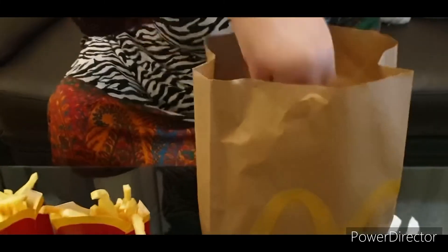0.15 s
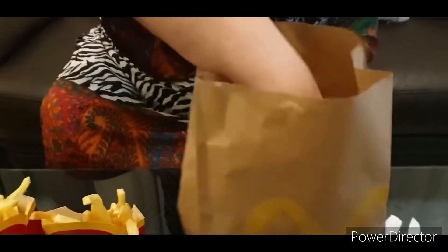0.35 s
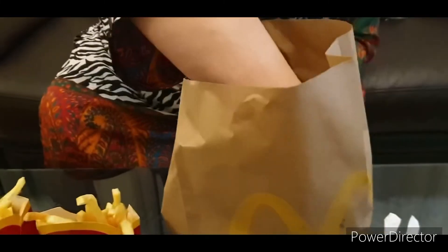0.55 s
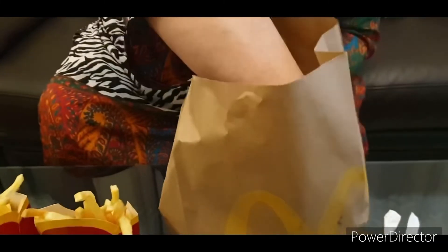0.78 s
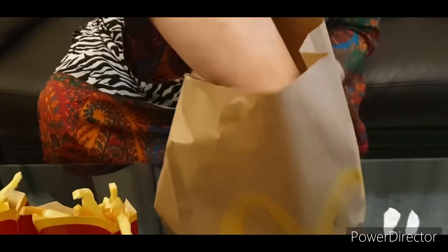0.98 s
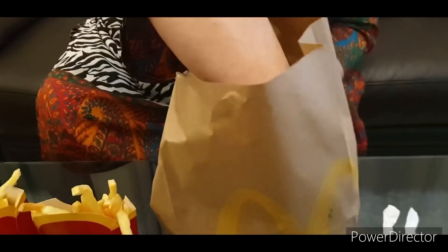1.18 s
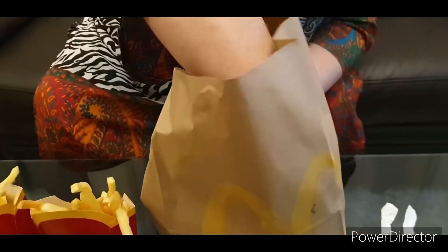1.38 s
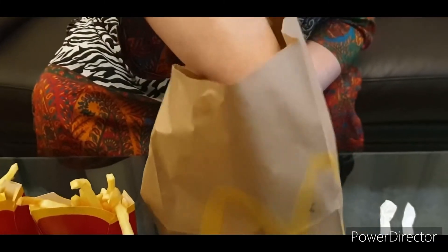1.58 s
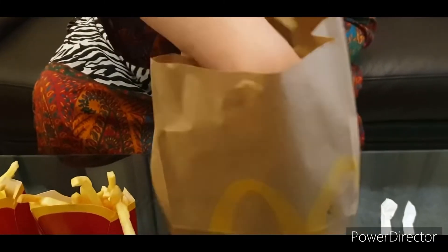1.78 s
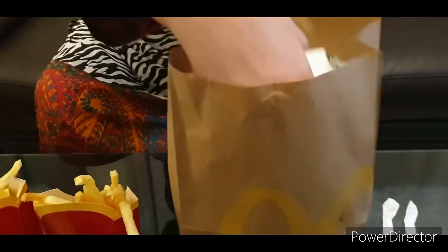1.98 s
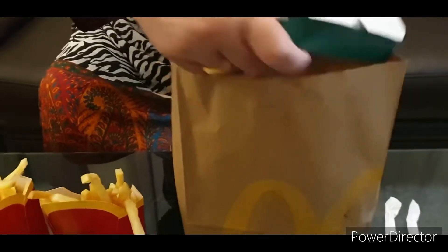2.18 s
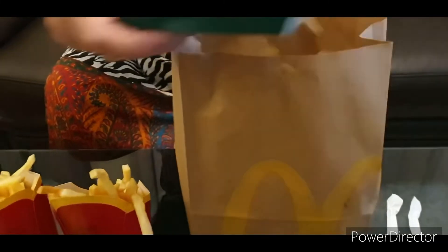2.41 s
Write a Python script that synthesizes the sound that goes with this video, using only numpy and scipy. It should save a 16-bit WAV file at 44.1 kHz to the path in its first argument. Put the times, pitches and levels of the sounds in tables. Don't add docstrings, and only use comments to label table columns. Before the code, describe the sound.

A stiff paper bag is rummaged by hand, close up. Faint room hum until 0.2 s, then a dense burst of crackles and hollow thumps as the hand enters. Sharp isolated snaps at 0.4-0.6 s, sparser ticks to 0.9, strong crinkling around 0.95 and 1.2-1.3, more snaps at 1.45, rustling and sliding 1.6-1.9, lighter crackle near 2.1, then soft settling into quiet by 2.3. Short indoor echoes.

```python
import sys
import numpy as np
from scipy import signal
from scipy.fft import rfft, irfft, next_fast_len
from scipy.io import wavfile
from scipy.ndimage import uniform_filter1d

SR = 44100
rng = np.random.default_rng(int(sys.argv[2]) if len(sys.argv) > 2 else 0)


def wav_out(sig):
    wavfile.write(sys.argv[1], SR, np.round(np.clip(np.atleast_2d(sig).T, -1, 1) * 32767).astype(np.int16))


def volts_from_db(level):
    exponent = np.asarray(level, float) / 20
    return 10 ** exponent


N = 108045

# frequency in Hz, level in dB.
HUM_COLOUR = [(18, -39), (30, 23), (415, 0), (649, -13), (8520, -33.5), (16000, 3.5)]
# time in seconds, crinkling level in dB, sliding level in dB.
HAND_MOTION = [(0, -51, -72), (.09, -85, -87), (0.188, -64.5, -86), (0.221, -44.5, -54),
               (0.448, -46.5, -58.5), (0.649, -51.5, -70), (0.852, -60.5, -72.5), (0.961, -38, -60),
               (1.128, -56.5, -63), (1.222, -42, -68), (1.379, -57.5, -67.5), (1.579, -50.5, -53),
               (1.721, -43, -51.5), (1.9, -47.5, -53), (2.021, -60.5, -51.5), (2.14, -45, -54),
               (2.298, -76.5, -85), (2.45, -79, -100)]
# frequency in Hz, level in dB.
CRINKLE_COLOUR = [(24, -31), (40, 8.5), (283, 2.5), (516, -1.5), (2150, -6), (7170, -35.5), (11600, -37),
                  (16000, -40.5)]
# frequency in Hz, level in dB, 60 dB decay time in seconds.
BAG_MODES = [(100, -1.5, 0.72), (171.7, 6.5, 0.17), (216, -20.5, 0.24), (291, 5, 0.24), (390.4, -3.5, 0.57),
             (715, 6, 0.057), (940, 4, 0.018)]
# frequency in Hz, level in dB.
SLIDE_COLOUR = [(800, -29.5), (1800, -1), (3200, -4.5), (6400, -5), (7300, -9), (10000, -6.5), (14000, -2),
                (16500, -15)]
# start in seconds, peak in dB, pitch in Hz.
THUMPS = [(0.127, -42.5, 240), (0.213, -28, 248), (0.329, -31, 257), (0.38, -27.5, 255), (0.466, -52, 288),
          (0.514, -25, 279), (0.664, -31, 140), (0.723, -33.5, 180), (0.944, -27, 167), (1.154, -26.5, 125),
          (1.184, -26, 130), (1.264, -22.5, 160), (1.443, -28.5, 218), (1.507, -33.5, 79),
          (1.568, -36.5, 114), (1.708, -50, 82), (1.707, -22.5, 139), (2.121, -39, 268),
          (2.123, -33.5, 166.6)]
# start in seconds, peak in dB, pitch in
# Hz.
MORE_THUMPS = [
    (0.257, -32.5, 100),
    (.465, -33.5, 145),
    (.99, -34, 298),
    (1.792, -32, 124),
    (2.204, -36, 284),
    (2.239, -49, 229),
    (2.259, -46.5, 137.5),
    (2.345, -47, 272),
]
# start in seconds, peak in dB, panel pitch in Hz,
# brightness in dB, volley length in ms.
CREASES_IN = [(0.196, -65, 610, -46, 7.4), (0.208, -30, 1940, -47, 14), (0.225, -32.5, 750, -25.5, 11.4),
              (0.2515, -29, 850, 0.5, 5.4), (0.258, -20, 1740, -24.5, 9), (0.272, -19, 1680, -8, 1.4),
              (0.288, -37.5, 1420, 2.5, 15), (0.357, -33.5, 774, -1, 8.2), (0.387, -18.5, 2040, -30, 3.4),
              (0.463, -17.5, 1110, -15.5, 3.4), (0.521, -15.5, 2020, -8, 3.6), (0.592, -20.5, 2250, 6, 1.9),
              (0.672, -30, 730, -54, 4), (0.739, -36, 407, -33, 2.9), (0.8995, -39, 1700, -24, 5),
              (0.912, -32, 2000, -32, 8.7), (0.935, -28, 1050, -19, 12), (0.9888, -23.5, 1405, -33, 2.5),
              (1.036, -51.5, 463, -39, 5.4), (1.1, -33.5, 690, -40, 3.7)]
# start in seconds, peak in dB, panel pitch in Hz,
# brightness in dB, volley length in ms.
CREASES_OUT = [(1.16, -27, 1660, -32, 3.4), (1.171, -25, 880, -9.5, 3.5), (1.186, -19.5, 1650, -12, 8.4),
               (1.191, -22.5, 680, -3.5, 7.2), (1.217, -29.5, 940, -2, 11), (1.259, -19.5, 1680, -2.5, 5),
               (1.266, -18.5, 905, -29, 4.1), (1.4, -38, 844, -33, 5), (1.433, -18.5, 1740, -22, 1.2),
               (1.455, -35, 654, -35, 8.2), (1.514, -39, 404, -26, 7.4), (1.658, -29, 1460, -10, 4.9),
               (1.688, -31, 640, -3.5, 25), (1.713, -26, 637, -3.5, 5.9), (1.7835, -17, 1294, -17, 2.5),
               (1.819, -38.5, 545, 3, 6.4), (2.064, -37.5, 670, -31, 7.3), (2.096, -27.5, 1200, -15.5, 9.1),
               (2.129, -33, 910, -34, 14.6), (2.1596, -27, 1140, -26.5, 4.3)]
# start in seconds, peak in dB, panel pitch in Hz,
# brightness in dB, volley length in ms.
TICKS = [(.130, -57, 1700, -50, 11), (.136, -67, 1940, -60, 50), (.525, -18, 784, -35.5, 2.8),
         (.597, -39, 2230, -24, 40), (.7793, -34.5, 2440, -50, 2), (.8778, -35, 3280, -40, 0.59),
         (.956, -31.5, 5800, -29, 3.9), (1.4075, -34, 3540, -28, 2.6), (1.616, -23.5, 1490, -15, 1.7),
         (1.726, -21, 1240, -24, 4.3), (1.773, -23.5, 1690, -32, 4.9), (1.942, -30.5, 1890, -26.5, 3),
         (2.326, -51.5, 790, -53.5, 17), (2.345, -47.5, 753, -46.5, 12.5)]
# start in seconds, #
# peak in dB, panel pitch in Hz, brightness in dB, volley length in ms.
MORE_CREASES = [(.2041, -46.5, 644, -30, 5.7), (.2265, -28.5, 3400, -27, 1.9), (.243, -29.5, 1120, -30, 5.1),
                (.253, -29, 4000, -16, 3.2), (.2615, -21.5, 1280, -28, 3.1), (.292, -38, 1500, -30, 2.6),
                (.3333, -38, 1830, -25, 4.1), (.7169, -36, 1850, -30, 4.9), (.7354, -31.5, 800, -35, 1.4),
                (.8737, -31.5, 2040, -40, 3.4), (.981, -32, 1760, -35, 3.5), (.9915, -28.5, 2230, -2, 2.6),
                (1.0307, -35.5, 1460, -30, 1.5), (1.1965, -18.5, 1520, -32, 1.5),
                (1.2235, -24.5, 2540, -12.5, 8.2), (1.2705, -23, 1320, -25, 3.9), (1.444, -32.5, 780, -27, 4),
                (1.511, -53, 1980, -3, 3.9), (1.5166, -37.5, 1600, -30, 3.5), (1.6024, -46, 1800, -30, 4),
                (1.6428, -36.5, 1330, -29, 5), (1.7122, -23, 2230, -12.5, 4.2), (1.718, -19.5, 920, -27, 0.78),
                (1.744, -30, 1800, -20, 2.7), (1.8235, -38, 1500, -26, 2), (1.85, -51, 2030, -26, 3.2),
                (1.875, -43.5, 2220, -27, 3.5), (1.896, -37.5, 1200, -12, 3.3), (.5215, -15, 10900, -30.5, 1.1),
                (.5915, -13.5, 11500, -30, 2.4), (1.101, -41.5, 392, -39, 13), (1.405, -41.5, 570, -40, 24),
                (2.052, -35, 1480, -23, 4), (2.1377, -33, 930, -27.5, 4), (.5222, -16.5, 3200, -33, 1.55),
                (.5917, -16.5, 3360, -26, 0.63), (.671, -25, 1860, -40, 1.5), (.1303, -50.5, 1870, -50, 3.8),
                (2.16, -33.5, 1510, -35, 0.99), (1.9421, -35, 1860, -35, 1.1)]
# frequency in Hz, level in dB.
CRACK_COLOUR = [(600, -17.5), (2000, 1), (3500, 2.5), (7300, -8.5), (10500, -8.5), (14000, -7),
                (16500, -18)]
# frequency in Hz, gain in dB.
LEFT_PORT = [(60, 3), (300, 4), (600, 3), (1200, 0.5), (2500, 1.5), (5000, 4.5), (9000, 3.5), (13000, -1)]
# frequency in Hz, gain in dB.
PHONE_RESPONSE = [(1000, -0.5), (3000, -1.28), (5000, -3.5), (8000, 0), (11000, 2), (15000, -6)]

SPOTS = 8
HUM_DB = -69.5
CRINKLES_PER_S, CRINKLE_SPREAD_DB, CRINKLE_TEAR_MS = 1800, 3.4, 1.77
CRINKLE_DB, CRINKLE_FLICKER_DB, BAG_DB = -3.5, 2, -6
SPOT_RING_HZ, SPOT_RING_DB = (691, 4930), 8.5
SLIDE_DB, SLIDE_FLICKER_DB = 3, -1.5
THUMP_DB, THUMP_Q, THUMP_S = -8.5, 4.3, 0.0095
SNAP_DB, CLICK_SPREAD_DB, RISE_SHARE = -3, 3.2, 0.063
RING_DB, RING_Q, RING_MS = 8, 3.5, 3.45
WIDE_Q, SKIRT_Q = 0.39, 0.55
CRACK_DB, CRACK_SHARE = 6.5, 0.26
NEAR_DB, NEAR_T60_S, NEAR_START_S = -4.5, 0.026, 0.0007
ROOM_DB, ROOM_T60_S, ROOM_START_S = -6.5, 0.3, 0.0076
ROOM_ALIKE_HZ, BASS_UNLIKE, TREBLE_UNLIKE = 1200, 0.43, 0.58
LEFT_DB, PAN_SPREAD_DB = 1.7, 1.2
RIGHT_LAG_S, LAG_SPREAD = 0.00006, 1
LEAD = 16
NOTCH_HZ, NOTCH_WIDTH_HZ, NOTCH_DEPTH = 7600, 580, 0.37
BASS_CUT_HZ, TOP_HZ = 43.7, 15900
OPPOSITE = np.array([[1], [-1]])


def unit(x):
    return x / np.sqrt(np.mean(x ** 2))


def colour(x, points):
    size = next_fast_len(x.shape[-1] + 4096)
    hz, db = np.array(points, float).T
    grid = np.maximum(np.fft.rfftfreq(4096, 1 / SR), 1)
    curve_db = np.interp(np.log(grid), np.log(np.maximum(hz, 1)), db)
    cepstrum = irfft(curve_db * np.log(10) / 20)
    cepstrum[1:2048] *= 2
    cepstrum[2049:] = 0
    response = irfft(np.exp(rfft(cepstrum)))
    return irfft(rfft(x, size) * rfft(response, size), size)[..., :x.shape[-1]]


def walk(rate):
    k = int(SR / rate)
    held = np.repeat(rng.standard_normal(N // 100), k)[:N]
    return unit(uniform_filter1d(uniform_filter1d(held, k), k))


def spiky(shape, spread_db):
    return rng.standard_normal(shape) * volts_from_db(spread_db * rng.exponential(size=shape))


def ring(grains, hz, q):
    s = 1j * np.fft.rfftfreq(grains.shape[1], 1 / SR) / hz[:, None]
    return irfft(rfft(grains) * s / q / (1 + s / q + s * s), grains.shape[1])


def even(grains):
    spectrum = rfft(grains)
    power = uniform_filter1d(np.abs(spectrum) ** 2, size=40)
    return irfft(spectrum / np.sqrt(power), grains.shape[1])


def place(times, peak_db, grains):
    out = np.zeros((SPOTS, N + grains.shape[1]))
    grains = grains * np.clip(np.linspace(4, 0, grains.shape[1]), 0, 1)
    for k, (t, db, grain) in enumerate(zip(times, peak_db, grains)):
        i = int(t * SR)
        out[k % SPOTS, i:i + len(grain)] += grain / np.abs(grain).max() * volts_from_db(db)
    return out[:, :N]


def hum():
    mid, side = rng.standard_normal((2, N))
    return volts_from_db(HUM_DB) * unit(colour(mid + 0.5 * side * OPPOSITE, HUM_COLOUR))


def bag_response():
    t = np.arange(8192) / SR
    modes = sum(volts_from_db(db) * np.sin(2 * np.pi * hz * t) * 1000 ** (-t / t60) for hz, db, t60 in BAG_MODES)
    paper = colour(np.eye(1, 8192)[0], CRINKLE_COLOUR)
    return paper / np.linalg.norm(paper) + volts_from_db(BAG_DB) * modes / np.linalg.norm(modes)


def crinkling(level_db):
    ticks = spiky((SPOTS, N), CRINKLE_SPREAD_DB)
    ticks = ticks * (rng.random((SPOTS, N)) < CRINKLES_PER_S / SR / SPOTS)
    fade = np.exp(-1000 / (CRINKLE_TEAR_MS * SR))
    tears = signal.lfilter([1], [1, -fade], np.abs(ticks)) * rng.standard_normal(ticks.shape)
    tears = tears * volts_from_db(level_db + CRINKLE_FLICKER_DB * walk(39.77)) / np.std(tears)
    crinkle = volts_from_db(CRINKLE_DB) * signal.fftconvolve(tears, bag_response()[None], axes=1)[:, :N]
    spot_hz = np.geomspace(*SPOT_RING_HZ, SPOTS)
    return crinkle + volts_from_db(SPOT_RING_DB) * ring(crinkle, spot_hz, 2.8)[:, :N]


def sliding(level_db):
    hiss = unit(colour(rng.standard_normal((SPOTS, N)), SLIDE_COLOUR))
    return hiss * volts_from_db(level_db + SLIDE_DB + SLIDE_FLICKER_DB * walk(17))


def rubbing():
    at, crinkle_db, slide_db = np.array(HAND_MOTION).T
    t = np.arange(N) / SR
    crinkle = crinkling(np.interp(t, at, crinkle_db))
    slide = sliding(np.interp(t, at, slide_db))
    return (crinkle + slide) / np.sqrt(SPOTS)


def thumps(size=8192):
    at, db, hz = np.array(list(THUMPS) + list(MORE_THUMPS)).T
    t = np.arange(size) / SR / THUMP_S
    push = rng.standard_normal((len(at), size)) * t * np.exp(-t)
    return place(at, db + THUMP_DB, ring(ring(push, hz, THUMP_Q), hz, 0.11))


def snaps(table, size=4096):
    at, db, hz, bright_db, ms = np.array(table).T
    t = np.arange(size) / SR / (np.maximum(ms, 0.5)[:, None] / 1000)
    volley = spiky((len(at), size), CLICK_SPREAD_DB) * (1 - np.exp(-t / RISE_SHARE))
    wide = ring(ring(even(volley * np.exp(-t)), hz, SKIRT_Q), hz, WIDE_Q)
    ring_gain = volts_from_db(RING_DB) * (ms / RING_MS)[:, None]
    body = ring(wide, hz, WIDE_Q) + ring_gain * ring(wide, hz, RING_Q)
    burst = even(volley * np.exp(-t / CRACK_SHARE))
    crack = colour(np.roll(burst, 24, axis=1), CRACK_COLOUR)
    return place(at, db + SNAP_DB, body) + place(at, db + bright_db + CRACK_DB, crack)


def echoes(db, t60, start):
    t = np.arange(SR // 2) / SR
    mid, side = rng.standard_normal((2, len(t)))
    high = signal.butter(1, ROOM_ALIKE_HZ, "high", fs=SR, output="sos")
    side = TREBLE_UNLIKE * signal.sosfilt(high, side) + BASS_UNLIKE * side
    tail = (mid + side * OPPOSITE) * 1000 ** (-t / t60) * (t > start)
    return volts_from_db(db) * tail / np.linalg.norm(tail[0])


def path():
    t = np.arange(SR // 2)
    lag = RIGHT_LAG_S * SR * (1 + LAG_SPREAD * rng.standard_normal())
    pan_db = LEFT_DB + PAN_SPREAD_DB * rng.standard_normal()
    direct = np.sinc(t - LEAD - np.array([[0], [lag]]))
    near = echoes(NEAR_DB, NEAR_T60_S, NEAR_START_S)
    room = echoes(ROOM_DB, ROOM_T60_S, ROOM_START_S)
    return (direct + near + room) * volts_from_db(pan_db / 2 * OPPOSITE)


def scene():
    creases = snaps(CREASES_IN) + snaps(CREASES_OUT) + snaps(TICKS)
    bag = creases + thumps() + rubbing()
    paths = [path() for _ in range(SPOTS)]
    bag = bag + snaps(MORE_CREASES)
    heard = np.zeros((2, N))
    for spot, response in zip(bag, paths):
        heard += signal.fftconvolve(spot[None], response, axes=1)[:, LEAD:N + LEAD]
    return heard + hum()


def band_limit(x):
    return signal.sosfilt(signal.butter(12, 16520, fs=SR, output="sos"), x)


def record(dry):
    heard = colour(np.array([colour(dry[0], LEFT_PORT), dry[1]]), PHONE_RESPONSE)
    bass_cut = signal.butter(2, BASS_CUT_HZ, "high", fs=SR, output="sos")
    heard = signal.sosfilt(bass_cut, heard)
    b, a = signal.iirpeak(NOTCH_HZ, NOTCH_HZ / NOTCH_WIDTH_HZ, fs=SR)
    notched = heard - NOTCH_DEPTH * signal.lfilter(b, a, heard)
    top_cut = signal.ellip(8, 0.2, 70, TOP_HZ, fs=SR, output="sos")
    mix = signal.sosfilt(top_cut, notched)
    return band_limit(mix)


dry = scene()
out = record(dry)
wav_out(out)
```